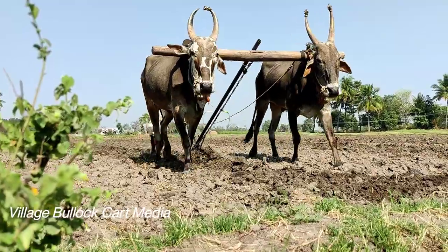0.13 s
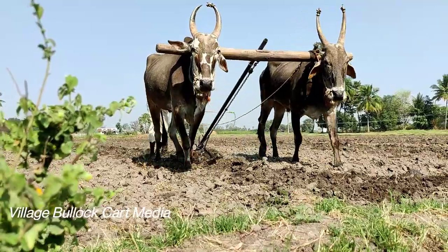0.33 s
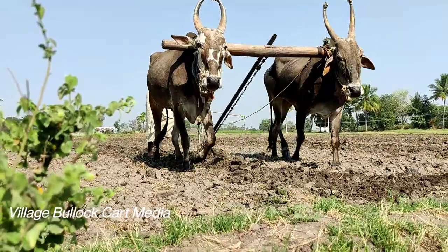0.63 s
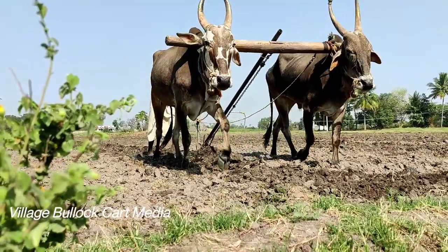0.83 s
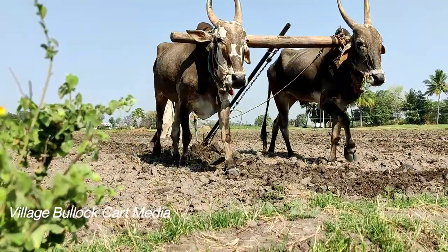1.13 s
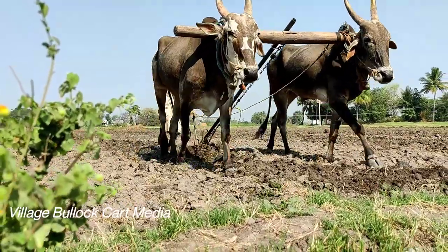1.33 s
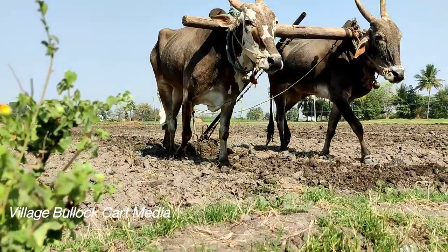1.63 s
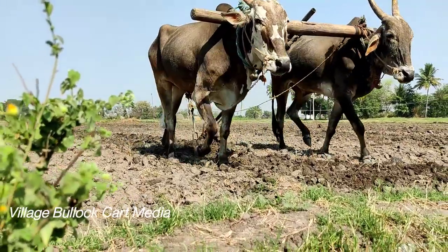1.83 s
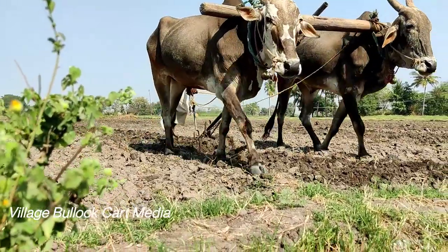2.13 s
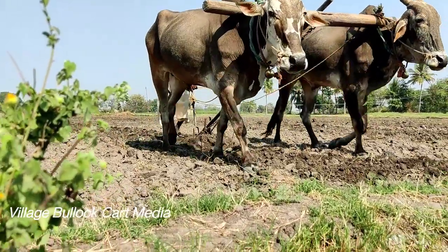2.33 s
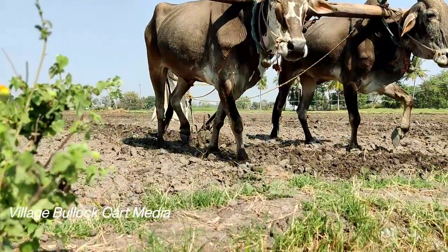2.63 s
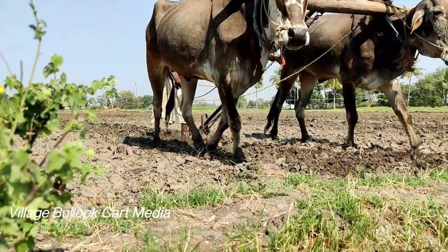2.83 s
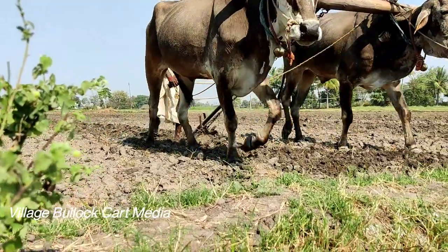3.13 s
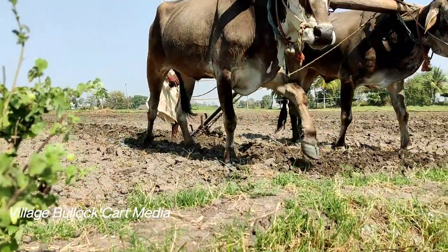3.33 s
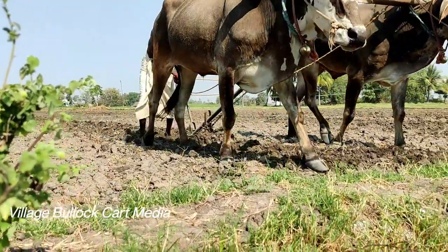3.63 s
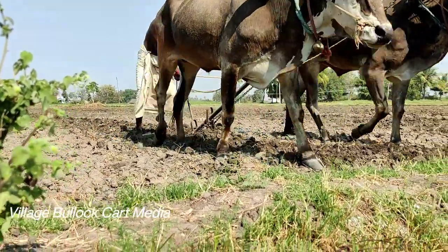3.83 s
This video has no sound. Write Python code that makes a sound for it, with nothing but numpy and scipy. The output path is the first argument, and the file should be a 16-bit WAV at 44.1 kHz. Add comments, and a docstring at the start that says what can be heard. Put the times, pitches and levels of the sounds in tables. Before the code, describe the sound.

Oxen pull a plough, clods cracking and yoke knocking, as wind rumbles and birds whistle.

```python
"""Oxen ploughing a field

Two yoked oxen pull a plough: soil crumbles off the share, clods snap under hooves, the wooden gear
clonks and a pellet chinks in a small harness bell. Birds whistle and chip, echoing off the tree line.
Leaves and grass hiss, and a light wind rumbles and thumps on the two microphone ports."""
import sys
import numpy as np
from scipy import signal
from scipy.fft import rfft, irfft, next_fast_len
from scipy.io import wavfile
from scipy.ndimage import uniform_filter1d, map_coordinates

SR = 44100
rng = np.random.default_rng(int(sys.argv[2]) if len(sys.argv) > 2 else 0)


def persist_wave(psi):
    """Save psi, clipped to +-1, as 16-bit WAV."""
    counts = np.round(np.clip(psi, -1, 1) * 32767).astype(np.int16)
    wavfile.write(sys.argv[1], SR, np.atleast_2d(counts).T)


N = 176400


def amp(db):
    """Decibels to gain."""
    return 10 ** (np.asarray(db) / 20)


def unit(x):
    """Scale to rms 1."""
    return x / np.sqrt(np.mean(x ** 2) + 1e-20)


def sides(difference):
    """Split a left-minus-right difference over the two channels."""
    return difference * np.array([[.5], [-.5]])


def along(points, hz):
    """Read (freq_hz, value) points on a log axis."""
    freqs, values = np.transpose(points)
    return np.interp(np.log(hz + 1), np.log(freqs + 1), values)


def curve(rows):
    """(time_s, value) points as one value per sample."""
    return np.interp(np.arange(N) / SR, *np.transpose(rows))


def wobble(rate):
    """A smooth random curve, rate knots a second."""
    return map_coordinates(rng.standard_normal(int(N * rate / SR) + 4), [np.arange(N) * rate / SR])


def filtered(x, response):
    """Filter x by a response given as a function of frequency."""
    size = next_fast_len(N + SR // 2)
    return irfft(rfft(x, size) * response(np.fft.rfftfreq(size, 1 / SR)), size)[..., :N]


def noise(spectrum, correlation=((100, 0),)):
    """Coloured stereo noise of rms 1; the left-right correlation sets its width."""
    def response(hz):
        width = np.arccos(np.clip(along(correlation, hz), -1, 1)) / 2
        return amp(along(spectrum, hz)) * [np.cos(width), np.sin(width)]
    mid, side = filtered(rng.standard_normal((2, N)), response)
    return unit(np.array([mid + side, mid - side]))


def add(track, start_s, sound, pan_db=0):
    """Mix a sound into a stereo track; positive pan is left."""
    part = track[:, max(round(start_s * SR), 0):][:, :len(sound)]
    part += amp(sides(pan_db)) * sound[:part.shape[1]]


def fade(t, t60):
    """Exponential decay, 60 dB down at t60."""
    return np.exp(-np.log(1000) * t / t60)


def ring(modes, pitch, attack_s):
    """A struck body: damped modes, a little different at each blow."""
    t = np.arange(SR // 5) / SR
    tones = np.zeros(len(t))
    for ratio, db, t60 in modes:
        envelope = amp(db + rng.normal(0, 1)) * fade(t, t60)
        tones += envelope * np.sin(2 * np.pi * (ratio * pitch * t + rng.random()))
    return tones * (1 - np.exp(-t / attack_s))


def furrow(grain_db=3, clump_db=2.2, pan_db=-3):
    """Soil crumbles off the share in clumps of small grains."""
    # the share breaking through the soil: time_s, level_db
    cut = [(1.718, -65), (1.738, -52), (1.82, -54.5), (1.852, -56), (1.89, -53.5), (1.95, -58.5),
           (2.05, -59.5), (2.8, -68.5), (3.6, -64.5)]
    # colour of crumbling soil: freq_hz, gain_db
    soil = [(120, -30), (200, -4.5), (385, -7), (641, 0), (783, -5), (1260, -3), (4330, -6), (6350, -5),
            (15500, -19)]
    crumbling = amp(grain_db * wobble(500) + clump_db * wobble(45))
    grains = unit(crumbling * noise(soil, correlation=[(600, 0.94), (2000, 0.041)]))
    return amp(curve(cut) + sides(pan_db)) * grains


def clods(level_db=-3, pan_db=-2, crumb_db=-56, crumb_spread_db=11, crumbs=80):
    """Clods and dry stalks snap under hooves: a tick, splintering, a crunch. Crumbs fall in between."""
    # fractures: start_s, gain_db, crunch_over_snap_db
    snaps = [(.047, -50, -3), (.269, -50, -26), (0.4049, -47.5, 1), (0.589, -51.5, -7), (0.967, -62.5, 12),
             (1.037, -49.5, -8), (1.528, -50, -21), (1.741, -56.5, 11.5), (1.786, -55, 8),
             (1.815, -58.5, 18), (1.8632, -40.5, -16), (1.8744, -37.5, -25), (1.879, -42.5, -22),
             (1.891, -55, 9.5), (1.903, -45, -22), (1.921, -44, -10), (1.991, -47, -20), (2.412, -44, -14),
             (2.63, -48, -27), (3.1603, -43.5, -4.5), (3.853, -49, -13), (3.949, -52, 2)]
    # colour of the bright snap: freq_hz, gain_db
    snap_colour = [(800, -10), (2500, 4.5), (7000, 8.5), (15000, -7)]
    # colour of the low crunch: freq_hz, gain_db
    crunch_colour = [(150, 2), (550, -5), (1300, -6), (3000, -17), (8000, -36)]
    snap, crunch = np.zeros((2, 2, N))
    t = np.arange(SR // 10) / SR
    crack = fade(t, t60=0.0043) + amp(-5) * fade(t, t60=0.03)  # first fracture, then splintering
    for start_s, db, crunch_db in snaps:
        add(snap, start_s, amp(db) * crack, pan_db)
        add(crunch, start_s, amp(db + crunch_db) * fade(t, t60=0.05))
    for when, smallness, weight in rng.random((crumbs, 3)):
        crumb = amp(crumb_db - crumb_spread_db * smallness) * crack
        add(snap, when * N / SR, crumb)
        add(crunch, when * N / SR, weight * crumb)
    snap *= noise(snap_colour)
    crunch *= noise(crunch_colour, correlation=[(800, 0.99)])
    return amp(level_db) * (snap + crunch)


def gear(beam_tuning=0.97):
    """The yoke clonks hollowly, some blows bright and some dull; the plough beam knocks sharply."""
    # blows on the yoke: start_s, gain_db, pitch_hz, upper_modes_db
    clonks = [(.477, -57, 942, -8), (.609, -50.5, 952, 0), (1.235, -57.5, 920, -8), (1.3225, -45, 893, 4),
              (1.335, -44.5, 916, -1), (1.3685, -43, 907, -1.5), (2.063, -54.5, 918, 4),
              (2.118, -54, 904, 0), (3.877, -48.5, 983, -12)]
    # yoke modes: pitch_ratio, gain_db, t60_s
    yoke = [(.74, -11.5, 0.063), (1, 0.5, 0.063), (1.1, -19, 0.037), (1.435, -8, 0.093), (1.71, -20, 0.09),
            (3.5, -11, 0.036)]
    # blows on the beam: start_s, gain_db
    knocks = [(2.6838, -42), (2.6868, -45), (2.6935, -46)]
    # beam modes before tuning: freq_hz, gain_db, t60_s
    beam = [(614, -4.5, 0.031), (713, -5, 0.041), (940, -8, 0.054), (1230, -5.5, 0.035), (1473, -4, 0.047),
            (1807, -9.5, 0.063)]
    out = np.zeros((2, N))
    for start_s, db, hz, upper_db in clonks:
        modes = [(ratio, level + upper_db * (ratio > 1.25), t60) for ratio, level, t60 in yoke]
        add(out, start_s, amp(db) * ring(modes, hz, attack_s=0.0008), pan_db=1.5)
    for start_s, db in knocks:
        add(out, start_s, amp(db) * ring(beam, beam_tuning, attack_s=0.00042))
    return out


def hoof(t60_s=0.016):
    """A hoof lands with a dull thud: one quickly damped mode."""
    # hoof fall: start_s, gain_db, pitch_hz
    thuds = [(1.353, -37.5, 373)]
    out = np.zeros((2, N))
    for start_s, db, hz in thuds:
        add(out, start_s, amp(db) * ring([(1, 0, t60_s)], hz, attack_s=0.00094))
    return out


def bell(rattle_db=-15, rattle_t60_s=0.089, damp_s=0.0026):
    """The pellet chatters and rings the little bell, which is damped at once against the harness."""
    # pellet strikes: start_s, gain_db, pitch_hz, undamped_s, pan_db
    chinks = [(0.2202, -40.5, 6100, 0.0026, 4), (0.224, -45.5, 5950, 0.0036, 3),
              (.279, -53, 5970, 0.0073, 7), (0.416, -44.5, 5860, 0.0052, 9), (.431, -52, 5970, 0.013, -1),
              (.606, -53.5, 5930, 0.0046, 14), (.637, -56, 5900, 0.0065, 11), (.986, -57, 5930, 0.0076, 13),
              (1.057, -56, 5840, 0.0072, 4), (2.5125, -37.5, 5860, 0.036, 2), (2.528, -45, 5860, 0.0067, 5),
              (2.562, -48, 5760, 0.0072, 3), (3.2585, -55.5, 5890, 0.0044, -1),
              (3.793, -49.5, 6020, 0.0087, 1), (3.969, -33.5, 5830, 0.013, -1)]
    # bell modes: pitch_ratio, gain_db, t60_s
    modes = [(1, 0.5, 0.082), (1.115, -9.5, 0.016), (1.25, -13, 0.027)]
    # colour of the chattering pellet: freq_hz, gain_db
    rattle = [(3500, -21), (5500, 1.5), (6500, 1), (7500, -4), (10000, -26)]
    tones, chatter = np.zeros((2, 2, N))
    t = np.arange(SR // 5) / SR
    for start_s, db, hz, undamped_s, pan_db in chinks:
        damping = np.exp(-np.maximum(t - undamped_s, 0) / damp_s)
        add(tones, start_s, amp(db) * ring(modes, hz, attack_s=0.0004) * damping, pan_db)
        add(chatter, start_s, amp(db + rattle_db) * fade(t, rattle_t60_s), pan_db)
    return tones + chatter * noise(rattle)


def bird(calls, shape, waver=0.0087, flutter_db=2):
    """A pure tone glides through one shape at each call; its high opening may be held back."""
    out = np.zeros((2, N))
    offset_s, ratio, shape_db = np.transpose(shape)
    t = np.arange(offset_s[0], offset_s[-1], 1 / SR)
    glide = uniform_filter1d(np.interp(t, offset_s, ratio), size=150)
    opening = np.clip(2 * t / offset_s[0], 0, 1) ** 2
    for bend_s, db, hz, *opening_db in calls:
        pitch = hz * glide * (1 + waver * wobble(200.5)[:len(t)])
        level_db = db + np.interp(t, offset_s, shape_db) + sum(opening_db) * opening
        envelope = amp(level_db + flutter_db * wobble(84.8)[:len(t)])
        add(out, bend_s + offset_s[0], envelope * np.sin(2 * np.pi * np.cumsum(pitch) / SR))
    return out


def birdsong():
    """Falling whistles and thin high slurs, each timed from the bend in its pitch."""
    # whistles: bend_s, gain_db, pitch_hz, opening_db
    whistles = [(2.615, -53.5, 2740, -20), (2.885, -58, 2820, -23), (3.1, -50.5, 2644, -0.5),
                (3.331, -58.5, 2750, -8)]
    # contour of a whistle: offset_s, pitch_ratio, gain_db
    whistle_shape = [(-.085, 1.66, -15), (-.05, 1.4, 1), (-.038, 1.37, -17), (-.028, 1.29, 0),
                     (-.005, 1.12, -0.5), (.005, .9, 1), (0.036, .83, -1), (0.09, .8, -4.5),
                     (.102, 0.8, -14)]
    # slurs: bend_s, gain_db, pitch_hz
    slurs = [(1.85, -57, 6150), (2.7, -58.5, 6120), (2.925, -61.5, 5530)]
    # contour of a slur: offset_s, pitch_ratio, gain_db
    slur_shape = [(-.06, 1.22, -12), (-.027, 1.05, -3), (0, 1, 0), (.035, 1.03, -2), (.055, 1.05, -20)]
    return bird(whistles, whistle_shape) + bird(slurs, slur_shape)


def bird_chips():
    """A second bird calls in short, rougher chips."""
    # chips: bend_s, gain_db, pitch_hz
    chips = [(1.18, -60, 2066), (1.208, -58, 3290), (1.603, -57, 3240), (1.792, -54, 3400),
             (1.99, -53.5, 3324), (2.18, -51, 3270), (2.437, -54, 3310), (2.638, -54.5, 3270),
             (2.853, -61, 3335)]
    # contour of a chip: offset_s, pitch_ratio, gain_db
    shape = [(-.05, 1.17, -16), (-.024, 1.18, -8), (-.012, 1.1, -10), (0, 1, 0), (.016, .8, -16)]
    return bird(chips, shape, waver=0.0187, flutter_db=3)


def tree_line(song, chips, team, song_db=-12.5, chips_db=-5.5, team_db=-18.5, slap_s=0.1, slap_db=-21):
    """The trees return a diffuse echo of birds and team, and a later slap of the song."""
    # what the leaves scatter of the birds: freq_hz, gain_db
    foliage = [(2200, 0), (3400, 0), (6000, 5)]
    # decay among the trees: freq_hz, t60_s
    decay = [(500, 0.17), (3000, 0.44), (10000, 0.13)]
    birds = amp(song_db) * song + amp(chips_db) * chips
    send = filtered(birds, lambda hz: amp(along(foliage, hz))) + amp(team_db) * team
    add(send, slap_s, amp(slap_db) * song[0])
    hz, t, bands = signal.stft(rng.standard_normal((2, SR // 2)), SR, nperseg=256)
    tail = signal.istft(bands * fade(t, along(decay, hz)[:, None]), SR, nperseg=256)[1]
    return signal.fftconvolve(send, tail / np.linalg.norm(tail[0]), axes=1)[:, :N]


def breeze(level_db=3, pan_db=3, lumps_db=2):
    """Light wind rumbles unevenly on both microphone ports."""
    # wind strength: time_s, gain_db
    strength = [(0, -41), (.7, -42), (1.25, -43.5), (1.45, -51.5), (1.68, -51.5), (1.76, -42), (2.5, -43.5),
                (2.8, -48), (3.1, -42), (3.55, -40.5), (4, -39)]
    # colour of the rumble: freq_hz, gain_db
    rumble = [(15, -0.5), (28, 3.5), (60, 0), (110, -12), (160, -23.5), (230, -36), (500, -91)]
    lumps = lumps_db * np.array([wobble(6.62), wobble(19)])
    return amp(curve(strength) + level_db + lumps + sides(pan_db)) * noise(rumble)


def gusts():
    """Gusts thump on one port at a time: a swell of low rumble and higher flutter."""
    # gusts on the left port: centre_s, half_length_s, rumble_db, flutter_db
    left = [(0.038, 0.026, -26.5, -70), (0.467, 0.028, -24.5, -27), (1.063, 0.015, -18, -34.5),
            (1.138, 0.012, -19.5, -32.5), (1.18, 0.042, -31, -68), (2.076, 0.03, -25, -63),
            (3.026, 0.041, -20.5, -42.5), (3.74, 0.038, -26, -43.5)]
    # gusts on the right port: centre_s, half_length_s, rumble_db, flutter_db
    right = [(0.238, 0.018, -28.5, -48), (0.601, 0.046, -28.5, -45.5), (3.662, 0.036, -31.5, -42)]
    # colour of a gust's rumble: freq_hz, gain_db
    rumble = [(12, -4.5), (28, 0.5), (60, -7.5), (100, -19), (300, -73.5)]
    # colour of its flutter: freq_hz, gain_db
    flutter = [(60, -34), (100, 11), (150, 0), (200, -13.5), (330, -25.5), (700, -66)]
    out = np.zeros((2, N))
    t = np.arange(N) / SR
    for port, thumps, low, high in zip(out, (left, right), noise(rumble), noise(flutter)):
        for centre_s, half_length_s, rumble_db, flutter_db in thumps:
            swell = np.exp(-((t - centre_s) / half_length_s) ** 2 / 2)
            for eddies, db in ((swell * low, rumble_db), (swell * high, flutter_db)):
                port += amp(db) * eddies * np.linalg.norm(swell) / np.linalg.norm(eddies)
    return out


def field(level_db=5, flicker_db=1):
    """The open-air hiss of leaves and grass."""
    # colour of the hiss: freq_hz, gain_db
    colour = [(140, -20), (230, -3.5), (357, -8), (434, -13), (517, -11), (606, -16.5), (925, -7.5),
              (1070, -11.5), (1900, -9.5), (3170, -9.5), (4600, -15.5), (6770, -10.5), (8370, -20.5),
              (15500, -18)]
    # its slow swell: time_s, gain_db
    swell = [(0, -66.5), (.8, -67.5), (1.25, -64.5), (1.68, -67.5), (2.6, -65), (2.85, -67), (3.15, -63),
             (3.42, -68.5), (3.7, -64), (4, -64)]
    # likeness of left and right: freq_hz, correlation
    likeness = [(500, 0.64), (1200, -0.3), (3000, -0.1)]
    # stereo lean: freq_hz, pan_db
    lean = [(600, 3), (2500, -4.5), (12000, 1)]
    hiss = filtered(noise(colour, likeness), lambda hz: amp(sides(along(lean, hz))))
    return amp(curve(swell) + level_db + flicker_db * wobble(9.9)) * hiss


def port_delay(x):
    """The camera body delays the sound at the right port."""
    # phase between the ports: freq_hz, left_lead_rad
    lead = [(2200, 0.18), (3200, 1.65), (6000, 1.24)]
    return filtered(x, lambda hz: np.exp(1j * sides(along(lead, hz))))


def scene():
    """The team close by, the birds farther off, wind over everything."""
    song, chips = birdsong(), bird_chips()
    team = gear() + hoof() + clods()
    tones = port_delay(bell() + song + chips)
    return furrow() + team + tones + tree_line(song, chips, team) + breeze() + gusts() + field()


def record(dry, top_hz=15600):
    """The camera keeps nothing above its band limit."""
    return filtered(dry, lambda hz: hz < top_hz)


dry = scene()
out = record(dry)
persist_wave(out)
```